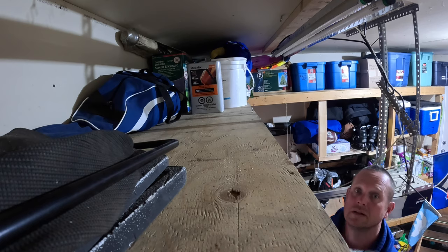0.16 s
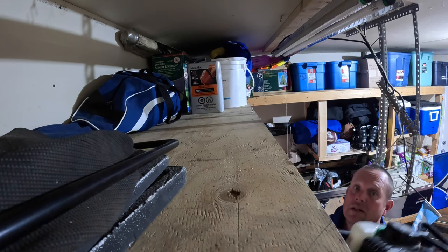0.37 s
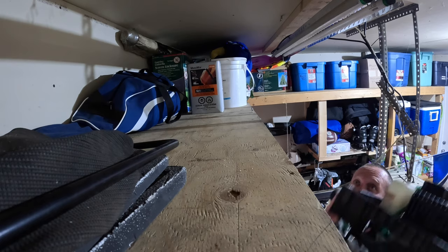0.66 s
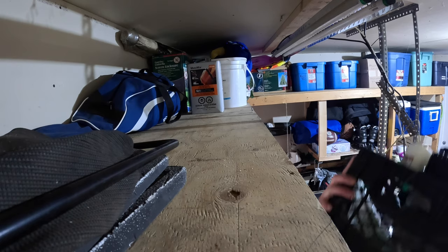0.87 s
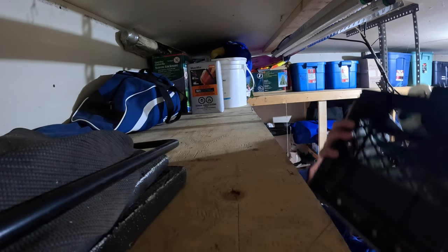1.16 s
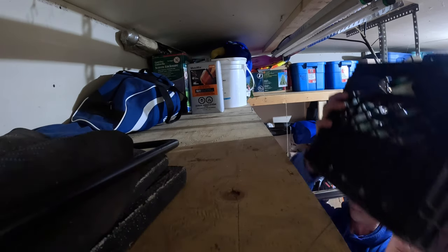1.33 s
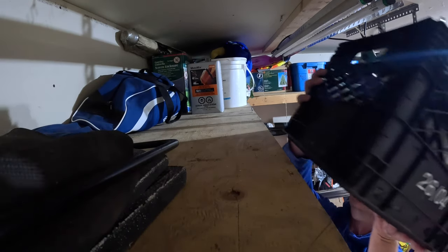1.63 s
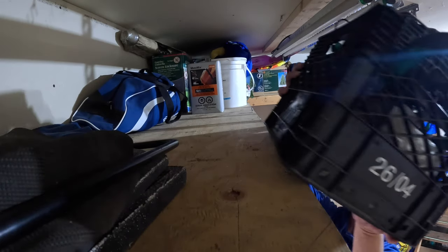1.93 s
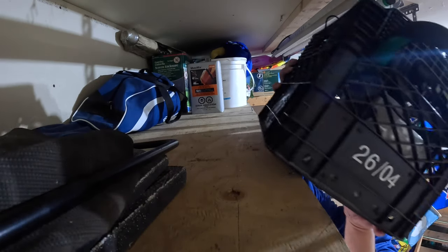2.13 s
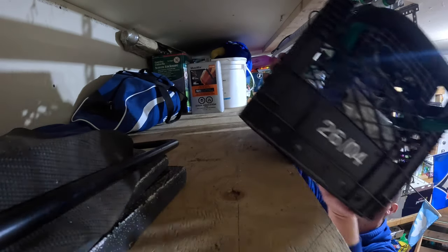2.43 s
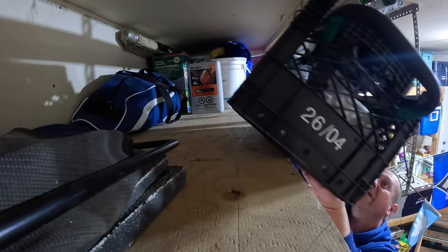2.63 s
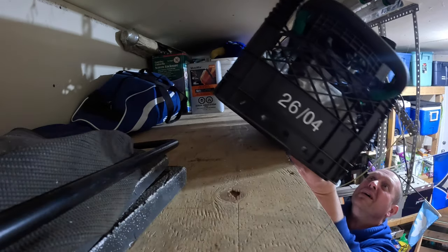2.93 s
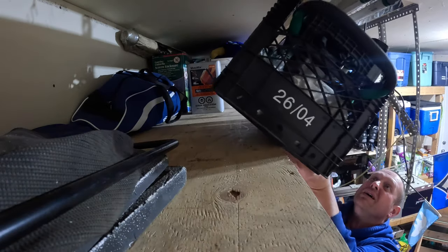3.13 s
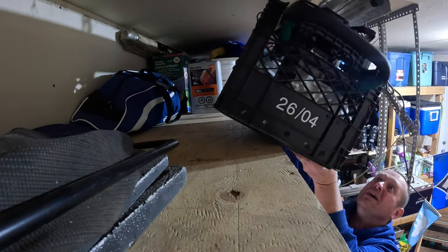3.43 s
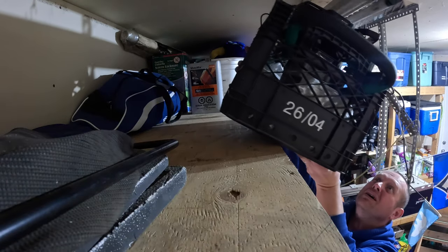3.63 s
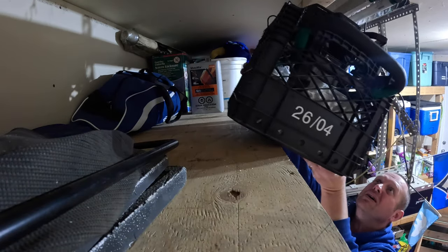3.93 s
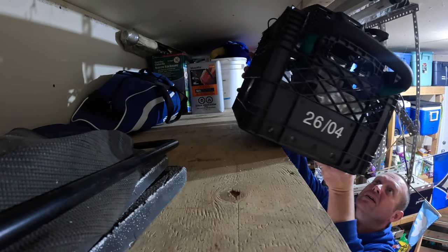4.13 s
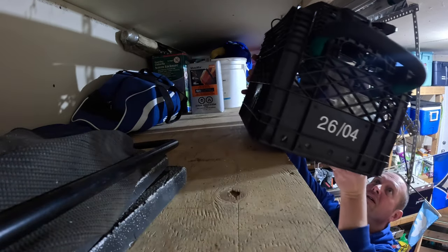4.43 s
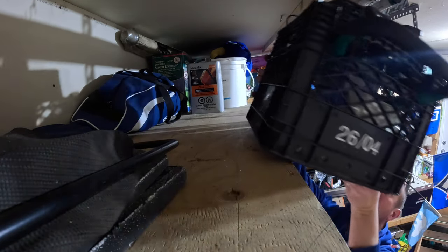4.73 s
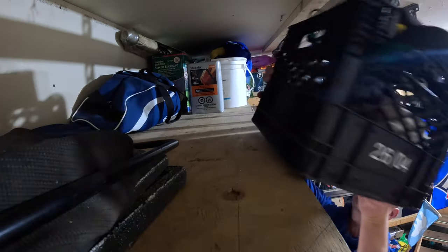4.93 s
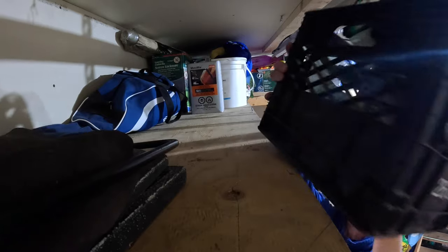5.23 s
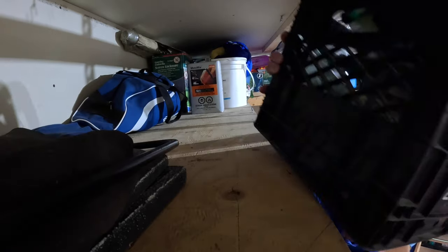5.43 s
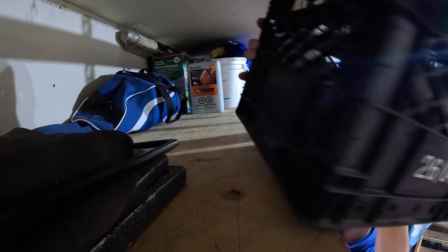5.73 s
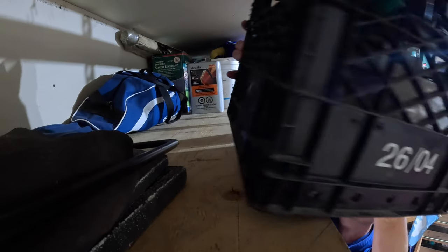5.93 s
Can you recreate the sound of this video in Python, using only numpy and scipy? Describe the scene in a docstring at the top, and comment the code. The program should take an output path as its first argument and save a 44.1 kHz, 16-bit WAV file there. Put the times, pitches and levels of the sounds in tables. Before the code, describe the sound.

Close on a shelf board, nearly mono: quiet rustling and tiny plastic ticks come first, over a low room hush. Then low wooden thuds and scuffs, followed by a rough plastic scrape that swells in jerks, chatters briefly, and peaks in a groaning, knocking skid. Afterwards only separate soft knocks, scuffs and ticks remain in the small garage.

```python
"""Crate dragged along a garage shelf

A plastic crate is lifted to a rough wooden shelf, bumps onto its edge and is dragged and turned along it.
Friction: grit under the crate drives its ribbed walls, its base and the board through their resonances.
Impact: blows ring modes of board and base, which also carry a groan of the base; loose things tick inside.
Stick and slip sets off a chatter; cloth and plastic rustle during the lift; a short room tail and a quiet
hush surround it all. It is heard on the same board, nearly in mono."""
import sys
import numpy as np
from scipy import signal
from scipy.fft import rfft, irfft, next_fast_len
from scipy.io import wavfile
from scipy.ndimage import uniform_filter1d, map_coordinates

SR = 44100
rng = np.random.default_rng(int(sys.argv[2]) if len(sys.argv) > 2 else 0)


def invert_db(x):
    """Field ratio 10**(x/20) for x, a level in decibels (scalar or array-like)."""
    u = np.asarray(x, float) / 20
    return 10 ** u


def to_wav(sig):
    """Store sig (one row per channel, or 1-D mono) as 16-bit WAV at the path in sys.argv[1].

    Samples outside -1..1 are clipped; the rate is SR.
    """
    pcm = np.clip(np.atleast_2d(sig), -1, 1) * 32767
    pcm = np.round(pcm).astype(np.int16)
    wavfile.write(sys.argv[1], SR, pcm.T)  # frames by channels


N = 268569  # samples


def unit(x):
    """Normalization: scaled to rms 1."""
    return x / np.sqrt(np.mean(x ** 2) + 1e-20)


def along(points, hz):
    """Interpolation of (f/Hz, value) points on a logarithmic frequency axis."""
    f, v = np.transpose(points)
    return np.interp(np.log(hz + 1), np.log(f + 1), v)


def curves(rows):
    """Interpolation in time: a curve for each column, then a gate that is open inside the table's time."""
    s, *columns = np.transpose(rows)
    t = np.arange(N) / SR
    inside = 1. * (t >= s[0]) * (t <= s[-1])
    gate = uniform_filter1d(inside, size=400)
    return [np.interp(t, s, column) for column in columns] + [gate]


def wobble(rate):
    """Band-limited chance: a smooth random curve with rate knots a second."""
    knots = rng.standard_normal(int(N * rate / SR) + 4)
    return map_coordinates(knots, [np.arange(N) * rate / SR])


def filtered(x, response):
    """Linear filtering: the spectrum of x times a complex response of frequency."""
    m = next_fast_len(N + SR // 2)
    spectrum = rfft(x, m) * response(np.fft.rfftfreq(m, 1 / SR))
    return irfft(spectrum, m)[..., :N]


def modes(table):
    """Modal superposition: the causal response of damped resonances with alternating sign."""
    def response(f):
        total = 0
        for k, (centre, width, db) in enumerate(table):
            damping = 1j * f * width
            total = total + (-1) ** k * invert_db(db) * damping / (centre * centre - f * f + damping)
        return total
    return response


def grit(per_second, spread_db, lumps_db):
    """Friction as shot noise: dense tiny contacts of uneven size, with a fluctuating level."""
    hits = rng.random(N) < per_second / SR
    sizes = invert_db(spread_db * rng.exponential(size=N)) * rng.standard_normal(N)
    lumps = invert_db(lumps_db * (wobble(40) + wobble(130)))
    return unit(hits * sizes * lumps)


def shifting(x, depth_db):
    """Moving excitation: as the contact spot travels, narrow resonances come up and fade again."""
    z = signal.stft(x, nperseg=1024, noverlap=768)[2]
    field = uniform_filter1d(rng.standard_normal(z.shape), size=2, axis=0)  # across frequency
    field = uniform_filter1d(field, size=10, axis=1)  # along time
    return signal.istft(z * invert_db(depth_db * unit(field)), nperseg=1024, noverlap=768)[1][:N]


# the steady drag: t/s, pressure as heard in the walls: level/dB, brightness (0-1),
# weight passed on to the shelf: level/dB, loaded part (0 deep board, 1 upper board, 2 base; fractions between)
DRAG = [(1.84, -62, 0.33, 1, 0.88), (2.1, -65.5, 0.045, 12.5, 0.52), (2.42, -58, 0.65, 13, 0.82),
        (2.6, -43.5, 0.62, 8, 1.04), (2.81, -43.5, 0.53, 5.5, 1.23), (2.95, -37.5, 0.2, 4, 0.77),
        (3.05, -40.5, .4, 1.5, 1.42), (3.27, -36.5, 0.34, 7.5, 1.6), (3.44, -39, .52, -8.5, 0.77),
        (3.6, -29.5, 0.53, -9.5, 2.1), (3.8, -39.5, 0.28, 3.5, 1), (3.88, -49.5, 0.24, 3, .3),
        (3.95, -35.5, 0.36, -2.5, 1.7), (4.09, -38, 0.33, 3.5, 0.65), (4.16, -44.5, 0.35, -0.5, 0.54),
        (4.27, -34.5, 0.18, 1.5, 0.7), (4.44, -34, 0.49, -3.5, 1.26), (4.55, -35.5, 0.34, 0.5, 1.3),
        (4.72, -28, 0.61, 2.5, 2.14), (4.8, -32.5, 0.13, 3.5, 1.57), (4.89, -29.5, 0.31, -2.5, 1.16),
        (5.03, -34, 0.18, 6.5, 0.84), (5.13, -55, .35, 3.5, 0.77), (5.28, -61, 0.045, 22, 0.34),
        (5.4, -65, .05, 17, .1), (5.72, -63, .05, 5.5, .1), (5.9, -63, 0.34, 14.5, 0.29),
        (6.09, -47, .15, -2.5, .3)]
# modes of the deep board: f/Hz, width/Hz, relative level/dB
DEEP_BOARD = [(59, 31.5, -6), (88.3, 16.7, -1), (102.2, 19, -1), (128.3, 17.7, 0.5)]
# modes of the upper board: f/Hz, width/Hz, relative level/dB
UPPER_BOARD = [(160, 20, -2), (190, 24, -1), (234, 19, -0.5), (300, 29.5, 1)]
# modes of the crate's base: f/Hz, width/Hz, relative level/dB
BASE = [(408, 33, -3.5), (446.6, 26.2, 2), (510.4, 44, -2.5), (562, 38, -2.5)]
# for deep board, upper board and base: gain/dB of each part, and how hard a scuff jolts it/dB
PART_DB, JOLT_DB = (-1.5, -7, -1), (-10, -5, -5.5)
OFF_PART_DB = 4.5  # loss one part away from the loaded one, growing with distance squared
JOLT_RISE_S, JOLT_FOLLOWS = 0.011, 0.72  # time constant of a jolt, share of the weight/dB it feels


def drag():
    """Forced vibration: the sliding base shakes walls, boards and base together; scuffs jolt the same parts."""
    walls_db, brightness, weight_db, part, gate = curves(DRAG)
    scuff_force, _ = catches()
    jolts = np.abs(filtered(scuff_force, lambda hz: 1 / (1 + 2j * np.pi * hz * JOLT_RISE_S)))
    shake = shifting(grit(1200, spread_db=1.5, lumps_db=1.5), depth_db=2.0)
    body = 0
    for k, table in enumerate((DEEP_BOARD, UPPER_BOARD, BASE)):
        load = invert_db(walls_db + weight_db) + invert_db(JOLT_DB[k] + JOLT_FOLLOWS * weight_db) * jolts
        share = invert_db(PART_DB[k] - OFF_PART_DB * (part - k) ** 2)
        body = body + load * share * unit(filtered(shake, modes(table)))
    return gate * (walls(invert_db(walls_db), brightness) + radiated(body))


# response of the ribbed walls before the dull or bright tilt: f/Hz, relative level/dB
WALLS = [(350, -13), (600, -0.5), (713, -6.5), (848, -3), (1060, -4.5), (1180, 1.5), (4030, -12.5),
         (4550, -18.5), (7160, -28), (8970, -43), (11900, -41.5), (13200, -57), (14500, -72)]


def walls(force, brightness):
    """Source and filter: grit under a force curve rings the ribbed walls, cross-faded from dull to bright."""
    rub = shifting(grit(9000, spread_db=2, lumps_db=1.03), depth_db=3.5)

    def tilted(power):
        return unit(filtered(rub, lambda hz: invert_db(along(WALLS, hz)) * (np.maximum(hz, 600) / 1800) ** power))

    dull, bright = tilted(-.7), tilted(1.)
    share = np.clip(brightness, 0, 1)
    return force * ((1 - share) * dull + share * bright)


def radiated(x):
    """Radiation efficiency: shelf and base sound mainly between two corner frequencies."""
    low_hz, top_hz = 52, 690
    return filtered(x, lambda hz: 1 / (1 + (low_hz / (hz + 1)) ** 4) / (1 + (hz / top_hz) ** 6))


def scuffs():
    """Transient friction: catches and clicks ring the walls."""
    return walls(*catches())


# sudden scuffs, where the crate catches and skids: t/s, nominal peak level/dB, length/s, treble share/dB
SCUFFS = [(1.899, -24.5, 0.036, -19), (1.983, -37, 0.043, -15), (2.2345, -35, 0.026, -21.5),
          (2.3377, -25, 0.042, -20), (2.434, -17.5, 0.029, -24), (2.479, -30.5, 0.016, -18),
          (2.509, -28.5, 0.03, -18), (2.612, -25, 0.04, -25.5), (2.652, -21.5, 0.012, -20.5),
          (2.694, -27, 0.041, -22.5), (2.87, -36.5, 0.035, -30), (2.904, -23.5, 0.02, -23),
          (2.974, -28, 0.026, -20), (3.091, -26, 0.028, -25), (3.323, -18.5, 0.032, -18.5),
          (3.518, -21, 0.044, -21.5), (3.544, -14.5, 0.079, -22.5), (3.593, -14, 0.026, -21.5),
          (3.63, -16.5, 0.034, -18), (3.909, -27.5, 0.024, -37), (4.058, -33.5, 0.02, -8),
          (4.248, -27, 0.028, -12.5), (4.374, -18.5, 0.037, -14), (4.565, -31, 0.03, -24),
          (4.6807, -17, 0.024, -15.5), (4.8046, -16, 0.046, -14), (4.84, -23, 0.033, -14.5),
          (4.858, -18, 0.039, -19), (5.006, -21.5, 0.024, -21.5), (5.14, -32.5, 0.026, -25.5),
          (5.175, -31, 0.03, -18), (5.199, -36.5, 0.028, -21), (5.237, -30.5, 0.017, -15.5),
          (5.4575, -24, 0.02, -19), (5.551, -36.5, 0.019, -26), (5.737, -38.5, 0.028, -27.5),
          (5.786, -29, 0.038, -20.5), (5.9165, -36.5, 0.048, -21), (6.013, -36, 0.029, -8)]
# the crate clicks in the hands while it is lifted: t/s, nominal peak level/dB
CLICKS = [(0.168, -44), (0.3284, -43), (0.351, -37.5), (0.538, -39), (0.691, -42), (0.764, -45.5),
          (0.934, -49), (1.0022, -32.5), (1.116, -50.5), (1.815, -49.5)]
CLICK_S, CLICK_TREBLE_DB = 0.009, -6
PEAK_OVER_RMS_DB = 9.5  # crest factor of a skid's grit


def catches():
    """Stick and slip: force and brightness of each catch, which starts sharply, skids and lets go."""
    t = np.arange(N) / SR
    force, brightness = np.zeros(N), np.zeros(N)
    clicks = [(s, db, CLICK_S, CLICK_TREBLE_DB) for s, db in CLICKS]
    for s, db, length, treble_db in clicks + SCUFFS:
        at = slice(round(s * SR) - 100, round((s + .25) * SR))
        u = t[at] - s
        onset = np.clip(u / 0.007 + .5, 0, 1)
        skid_db = -3 * u / 0.1
        release_db = -60 * np.maximum(u - length, 0) / (0.019 + 1.2 * length)
        shape = onset * invert_db(skid_db + release_db)
        force[at] = np.maximum(force[at], invert_db(db - PEAK_OVER_RMS_DB) * shape)
        brightness[at] = 1.42 + treble_db / 20
    return force, brightness


# blows on board and base, and a groan of the base near 4.7 s:
# t/s, level/dB before radiation, f/Hz of the modes that are favoured
THUDS_AND_GROAN = [(0.195, -40.5, 228), (.326, -44, 95), (1.925, -17, 152), (2.237, -21, 281),
                   (2.284, -27, 79.6), (2.362, -18, 244), (2.386, -27, 109), (2.440, -40, 575),
                   (2.453, -16.5, 116), (2.475, -26, 92.5), (2.625, -21, 510), (2.632, -16, 101),
                   (2.637, -21, 200), (2.715, -29, 513), (2.741, -26, 520), (2.951, -21.5, 111),
                   (3.56, -20.5, 294), (3.6, -24, 111), (3.645, -19, 400), (4.02, -22.5, 120),
                   (4.1, -25, 110), (4.26, -27, 110), (4.688, -31, 460), (4.721, -6, 463), (4.758, -4, 466),
                   (4.807, -14.5, 300), (4.852, -9, 540), (4.873, -18.5, 128), (4.924, -9, 464),
                   (4.965, -13, 131), (4.979, -7.5, 229), (5.003, -20, 163), (5.033, -10.5, 143),
                   (5.192, -18, 460), (5.201, -22.5, 138), (5.239, -15, 160), (5.271, -22.5, 97),
                   (5.46, -19, 128), (5.494, -19.5, 99), (5.738, -30, 575), (5.789, -21.5, 380),
                   (5.824, -32, 110), (6.014, -28, 122), (6.038, -34, 160)]


def thuds_and_groan():
    """Modal excitation: each blow or pulse of the groan rings the modes near its f; wider modes die sooner."""
    out, t = np.zeros(N + SR), np.arange(SR // 2) / SR
    hz, width, level_db = np.transpose(DEEP_BOARD + UPPER_BOARD + BASE)[:, :, None]
    decay = np.exp(-np.pi * .7 * width * t)  # slower than the widths alone would give
    rings = np.sin(2 * np.pi * hz * t) * decay * (1 - np.exp(-t / .004))
    for s, db, favoured_hz in THUDS_AND_GROAN:
        share = invert_db(level_db - 60 * np.log2(hz / favoured_hz) ** 2)
        out[round(s * SR):][:len(t)] += invert_db(db) * np.sum(share * rings, axis=0) / np.sum(share)
    return out[:N]


# a corner of the base chatters: t/s, pitch f/Hz, level/dB, overtones' level/dB
CHATTER = [(3.585, 885, -42, 3), (3.6, 876.6, -17.5, -12), (3.63, 870, -21, -13), (3.66, 801, -25.5, -11),
           (3.68, 898, -59, -20), (3.705, 866, -31, -18), (3.73, 827, -44, -16)]
# upper tones of the chatter: multiple of the pitch, relative level/dB
OVERTONES = [(2.08, 5), (2.501, 3), (3.079, -1)]


def chatter():
    """Self-excited oscillation: stick and slip locks onto a few unsteady tones."""
    hz, db, overtones_db, gate = curves(CHATTER)
    cycles = np.cumsum(hz) / SR

    def tone(multiple):
        return invert_db(2.5 * wobble(60)) * np.sin(2 * np.pi * multiple * cycles + .6 * wobble(40))

    upper = sum(invert_db(level) * tone(multiple) for multiple, level in OVERTONES)
    return gate * invert_db(db) * (tone(1) + invert_db(-3.5) * tone(.46) + invert_db(overtones_db) * upper)


# loose things ticking in the crate: t/s, level/dB before a common gain, ring f/Hz, t60/s (at least 0.01 s is used)
TICKS = [(0.169, -39.5, 1760, 0.023), (0.5385, -34, 1720, 0.092), (0.9907, -39.5, 1113, 0.056),
         (1.0034, -46, 1500, 0.025), (1.1127, -40, 3190, 0.015), (1.6202, -55, 1860, 0.038),
         (5.47, -36, 1460, 0.028), (5.7378, -34, 1460, 0.041), (5.7852, -32.5, 1220, 0.058),
         (5.927, -31.5, 1940, 0.02)]


def ticks():
    """Free vibration: each tick is a close pair of tones and one higher mode, decaying exponentially."""
    out, t = np.zeros(N + SR), np.arange(SR // 4) / SR
    for s, db, hz, t60 in TICKS:
        ring = 0
        for ratio, strength in ((1, 1), (1.07, 0.31), (1.54, 0.2)):
            phase = rng.random() * 2 * np.pi
            ring = ring + strength * np.sin(2 * np.pi * hz * ratio * t + phase)
        envelope = (1 - np.exp(-t / 0.0012)) * invert_db(-60 * t / max(t60, .01))
        out[round(s * SR):][:len(t)] += invert_db(db + 2.5) * envelope * ring
    return out[:N]


# sleeves and crate rustle while lifting: t/s, effort as level/dB before a common gain
RUSTLE = [(0.0, -59), (0.13, -65), (0.206, -56), (0.29, -65.5), (0.35, -53.5), (0.46, -57), (0.62, -64.5),
          (1.03, -58.5), (1.27, -69.5), (1.86, -72.5)]
# spectrum of the rubbing: f/Hz, relative level/dB
CLOTH = [(120, -64), (200, -4), (355, -8), (388, -13), (546, -8.5), (1340, -5.5), (1780, -9.5),
         (11900, -32.5), (14500, -51)]
# low bumps from the hands swing wider than the rubbing: level/dB at a reference effort/dB, dB per dB of effort
HANDS_DB, HANDS_FROM_DB, HANDS_GROW = -64, -54.5, 4.5
LOW_HUSH_DB = -69  # low background hush of the garage, steady during the lift


def rustle():
    """Filtered noise: rubbing of cloth and plastic, low bumps from the hands and the garage's low hush."""
    effort_db, gate = curves(RUSTLE)
    contacts = grit(12000, spread_db=1.5, lumps_db=-1.5)
    hiss = unit(filtered(contacts, lambda hz: invert_db(along(CLOTH, hz))))
    low = unit(filtered(rng.standard_normal(N), modes(DEEP_BOARD + UPPER_BOARD)))
    hands = invert_db(HANDS_DB + HANDS_GROW * (effort_db - HANDS_FROM_DB))
    low_hush = invert_db(LOW_HUSH_DB)
    return gate * (invert_db(effort_db + 1.5) * hiss + (hands + low_hush) * low)


def tail(x, t60s, seconds):
    """Reverberation: x through a noise tail in which each frequency dies at its own speed."""
    hz, t, z = signal.stft(rng.standard_normal(round(seconds * SR)), SR, nperseg=256)
    decay = invert_db(-60 * t / along(t60s, hz)[:, None])
    answer = signal.istft(z * decay, SR, nperseg=256)[1]
    return signal.fftconvolve(x, answer / np.linalg.norm(answer))[:N]


# spectrum of the quiet garage: f/Hz, relative level/dB
AIR = [(15, -36), (25, -12), (74, -6), (234, -41), (368, -13), (432, -9.5), (934, -16.5), (1870, -25),
       (2190, -21.5), (3440, -28.5), (14500, -77)]
AIR_DB = -68.5


def air():
    """Stationary noise: the hush of the garage, its level wavering slightly."""
    hush = unit(filtered(rng.standard_normal(N), lambda hz: invert_db(along(AIR, hz))))
    return invert_db(AIR_DB + 0.4 * wobble(1.56)) * hush


# reverberation of the garage: f/Hz, t60/s
GARAGE = [(150, 0.31), (1000, 0.32), (8000, 0.23)]


def scene():
    """Superposition: crate, shelf and garage summed at one spot."""
    near = drag() + scuffs() + radiated(thuds_and_groan()) + chatter() + ticks() + rustle()
    mono = near + invert_db(-10.0) * tail(near, GARAGE, seconds=.5) + air()
    return np.array([mono, mono])


def top_cut(x):
    """Nothing passes above the cut-off."""
    return signal.sosfilt(signal.butter(12, 15080, fs=SR, output="sos"), x)


# left-right difference against the sum: f/Hz, level/dB
PORTS = [(60, -43), (600, -53), (1900, -40.5), (8100, -28.5), (10500, -17), (11800, -3), (14500, 8)]
# the housing cancels a band: f/Hz, width/Hz, depth (0-1)
NOTCH = (8910, 1800, 0.63)
TOP_HZ = 14300  # upper limit of the sum of both ports


def record(dry):
    """Spatial coherence: two close ports differ mainly in the top treble; the housing notches one band."""
    centre, width, depth = NOTCH

    def notch(f):
        return 1 - depth * 1j * f * width / (centre ** 2 - f * f + 1j * f * width)

    mid = filtered(dry[0], lambda f: notch(f) * (f < TOP_HZ))
    z = signal.stft(mid, nperseg=256)[2]
    random_phase = np.exp(2j * np.pi * rng.random(z.shape))
    scattered = signal.istft(z * random_phase, nperseg=256)[1][:N]  # similar spectrum, unrelated phases
    side = filtered(scattered, lambda hz: invert_db(along(PORTS, hz)))
    return top_cut(np.array([mid + side, mid - side]))


dry = scene()
out = record(dry)
to_wav(out)
```